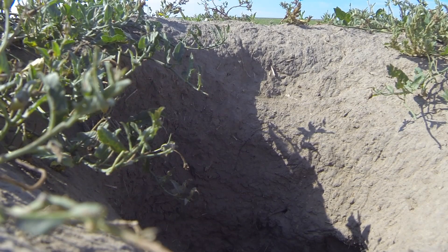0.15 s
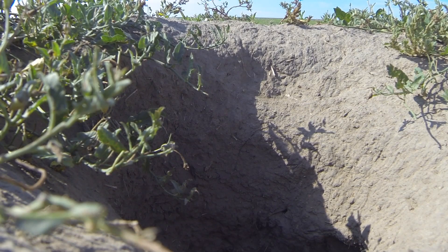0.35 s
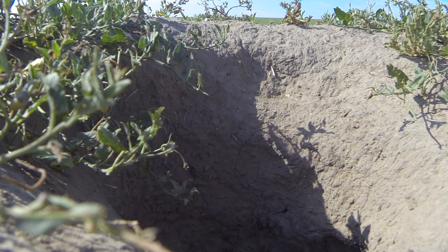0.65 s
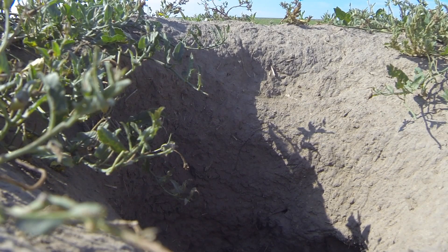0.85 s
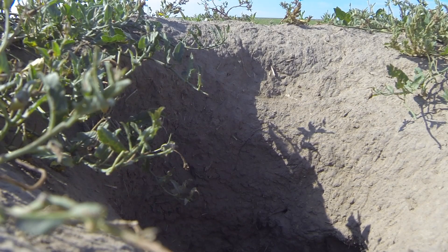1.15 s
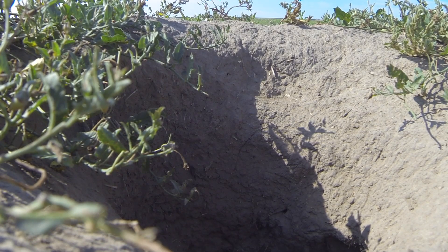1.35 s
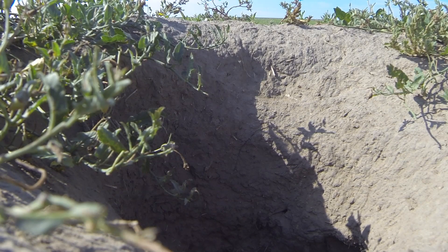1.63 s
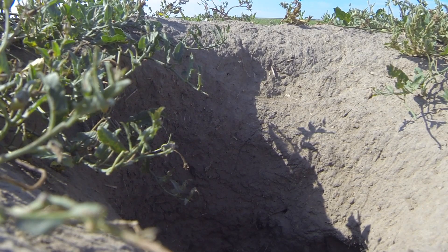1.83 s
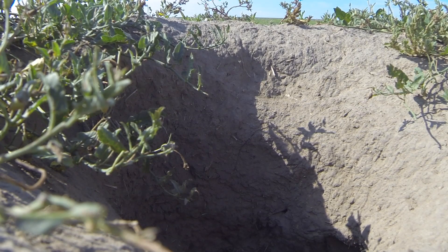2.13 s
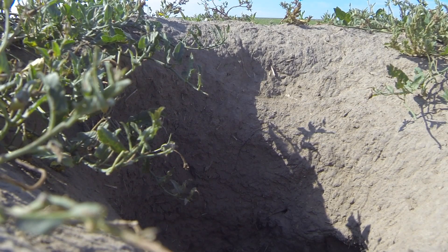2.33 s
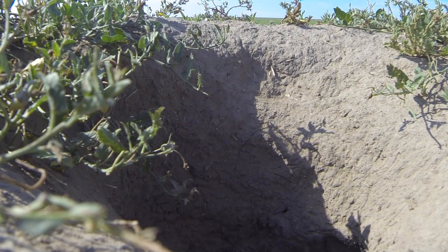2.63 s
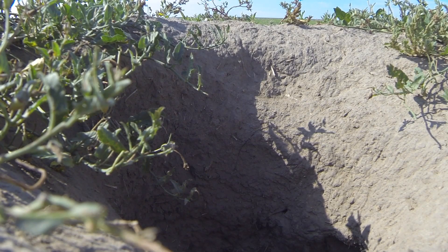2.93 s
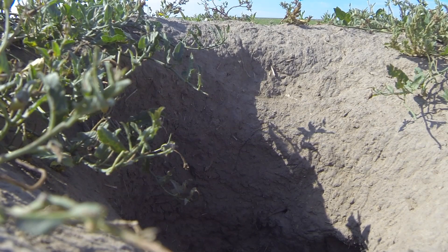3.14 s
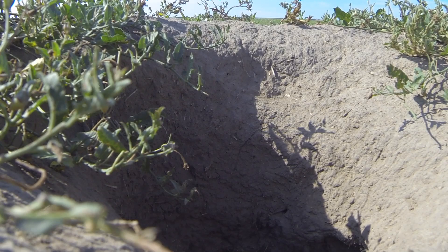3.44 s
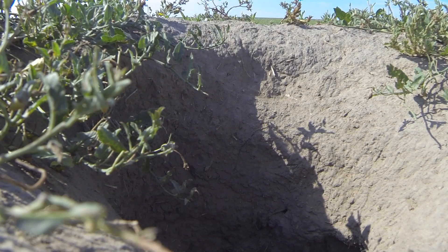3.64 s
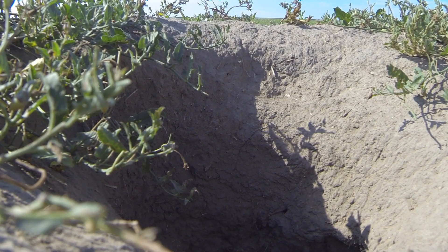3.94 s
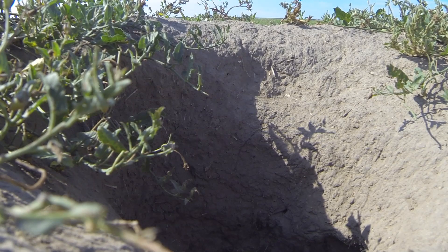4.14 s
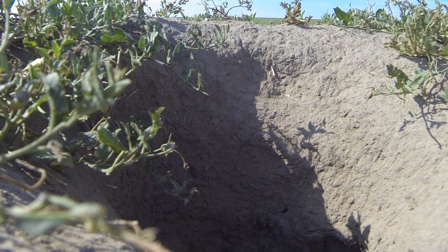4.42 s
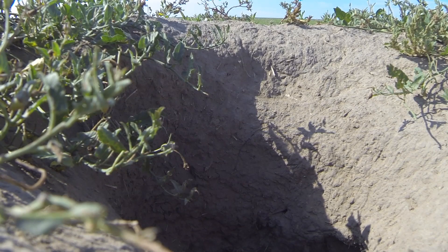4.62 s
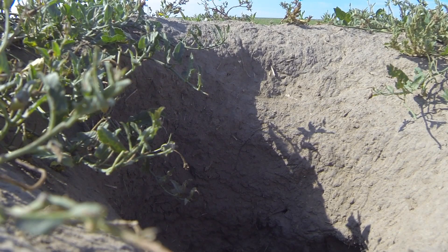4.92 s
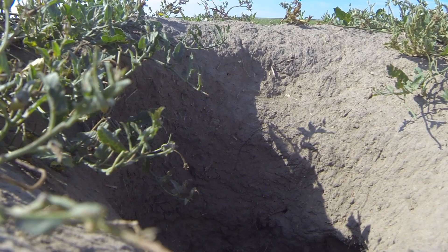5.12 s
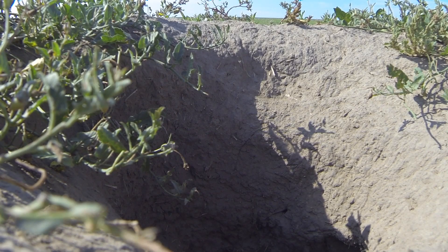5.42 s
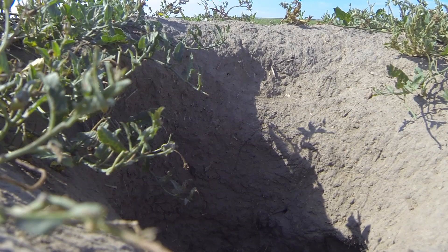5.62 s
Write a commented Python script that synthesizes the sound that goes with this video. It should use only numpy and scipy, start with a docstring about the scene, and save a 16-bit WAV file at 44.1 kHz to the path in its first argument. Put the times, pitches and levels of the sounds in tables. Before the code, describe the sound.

A prairie dog close by gives seven short, sharp, raspy barks, each trailed by a small falling squeak and grunt, over light wind.

```python
"""Open grassland, close to a burrow: a prairie dog barks seven times.
Each bark is a short, rough arch of pitch, built from wavering harmonics and breath through throat resonances.
Small ticks frame it; a raspy, falling squeak and a low grunt follow as the animal recoils.
Behind lie light wind and hiss (coloured noise), a deep drone (noise and a sinking sine) and a thin whine
(narrow-band noise), with soft rustles and clicks before the barking and one faint, distant peep."""
import sys
import numpy as np
from scipy import signal
from scipy.fft import rfft, irfft, next_fast_len
from scipy.io import wavfile
from scipy.ndimage import uniform_filter1d, map_coordinates

SR = 44100
rng = np.random.default_rng(int(sys.argv[2]) if len(sys.argv) > 2 else 0)


def transcribe(signal):
    """Save signal, clipped to [-1, 1], as a 16-bit WAV file at the path in sys.argv[1]."""
    frames = np.atleast_2d(signal).T
    limited = np.clip(frames, -1, 1)
    pcm = np.round(limited * 32767).astype(np.int16)
    wavfile.write(sys.argv[1], SR, pcm)


N = 254456

# Barks: onset t/s, then rise/s, break/s and length/s from the onset,
# crest f/Hz, level/dB (before the throat), roughness offset/dB
BARKS = [ (1.55, 0.013, 0.021, 0.054, 2040, -8, -0.5), (2.091, 0.018, .036, .050, 1988, -11, 0.5),
         (2.9294, 0.01, 0.022, 0.055, 2055, -8.5, 0), (3.518, 0.016, .026, 0.051, 2005, -11, -1.5),
         (4.0968, .015, .025, .052, 1957, -10, 1.5), (4.583, .010, .027, 0.052, 1956, -9.5, 0),
         (5.307, 0.016, .037, 0.053, 1986, -11, 1)]


def amp(db):
    """Decibels to gain."""
    return 10 ** (np.asarray(db) / 20)


def unit(x):
    """Scale to rms 1."""
    return x / np.sqrt(np.mean(x ** 2) + 1e-20)


def curves(rows):
    """One value per sample for each column after the time."""
    s, *cols = np.transpose(rows)
    return [np.interp(np.arange(N) / SR, s, c) for c in cols]


def wobble(rate, size):
    """A smooth random curve with rate knots a second."""
    knots = rng.standard_normal(size // 8)
    return map_coordinates(knots, [np.arange(size) * rate / SR], mode="mirror")


def filtered(x, response):
    """Filter x by a zero-phase response given as a function of f/Hz."""
    m = next_fast_len(len(x) + 8192)
    spectrum = rfft(x, m) * response(np.fft.rfftfreq(m, 1 / SR))
    return irfft(spectrum, m)[:len(x)]


def colour(points):
    """Response through (f/Hz, level/dB) points on a log frequency axis."""
    f, db = np.transpose(points)
    return lambda hz: amp(np.interp(np.log(hz + 1), np.log(f), db))


def resonances(modes):
    """Response summed from steep-sided (f/Hz, width/Hz, level/dB) peaks."""
    return lambda hz: sum(amp(db) / (1 + ((hz - centre) / width) ** 2) ** 2 for centre, width, db in modes)


def noise(response):
    """Coloured noise of rms 1."""
    return unit(filtered(rng.standard_normal(N), response))


def add(track, s, sound):
    """Mix a sound into the track at time s."""
    room = track[round(s * SR):][:len(sound)]
    room += sound[:len(room)]


def gate(start, end, fade):
    """0 outside start..end and 1 inside, with straight fades."""
    t = np.arange(N) / SR
    return np.clip(np.minimum(t - start, end - t) / fade, 0, 1)


def glide(length, pitches_hz, overtone_db, rough):
    """A soft swelling tone through first, middle and last pitch; rough jitters its pitch and level."""
    u = np.clip(np.arange(SR // 10) / SR / length, 0, 1)
    pitch = np.interp(u, [0, .5, 1], pitches_hz) * (1 + rough / 10 * wobble(500, len(u)))
    phase = 2 * np.pi * np.cumsum(pitch) / SR
    tone = np.sin(phase) + amp(overtone_db) * np.sin(2 * phase)
    swell = 4 * u * (1 - u)
    return np.sqrt(2) * tone * swell * (1 + rough * wobble(378, len(u)))


def wind(buffet_gain_db=3, grass_gain_db=2):
    """A light breeze bumps the microphone and brushes the grass: two noises that sway together."""
    # Wind level before the gains: t/s, buffet level/dB, grass level/dB
    breeze = [(0.0, -47, -59), (0.56, -49.5, -58.5), (1.78, -50, -58.5), (2.54, -52.5, -60),
              (2.81, -54.5, -59.5), (3.89, -53, -60.5), (4.5, -55, -60.5), (5.09, -52.5, -60.5),
              (5.37, -56.5, -58.5), (5.77, -52, -61.5)]
    # Low spectrum of the microphone bumps: f/Hz, relative density level/dB
    buffet_colour = [(15, -3.5), (30, -9.5), (50, -1.5), (80, -0.5), (120, -7.5), (200, -13.5),
                     (400, -38.5), (900, -84.5)]
    # Spectrum of the brushed grass: f/Hz, relative density level/dB
    grass_colour = [(60, -31), (150, -21.5), (220, -6.5), (350, -12), (600, -15), (1400, -23.5),
                    (2100, -28.5), (4000, -35), (8000, -42), (9500, -45.5), (11000, -49.5), (13000, -57),
                    (14000, -66)]
    buffet_db, grass_db = curves(breeze)
    sway_db = .5 * wobble(7, N)
    # the bumps sway twice as far in dB as the grass
    buffet = amp(buffet_db + buffet_gain_db + 2 * sway_db) * noise(colour(buffet_colour))
    grass = amp(grass_db + grass_gain_db + sway_db) * noise(colour(grass_colour))
    return buffet + grass


def drone(note_db=-42.5, rumble_db=-50, swell_db=3.0):
    """A deep, swelling rumble of narrow noise; a slowly sinking sine rises out of it past halfway."""
    start_s, fade_s = 3.25, .3
    note_hz, sag_hz_per_s = 44.8, 3.5  # pitch as the note starts, and its fall
    age = np.arange(N) / SR - start_s
    note = np.sqrt(2) * np.sin(2 * np.pi * np.cumsum(note_hz - sag_hz_per_s * age) / SR)
    rumble = amp(swell_db * wobble(6, N)) * noise(resonances([(40.18, 18, 0)]))
    return amp(note_db) * np.clip(age / fade_s, 0, 1) * note + amp(rumble_db) * rumble


def whine(whine_db=-75.0, hop_db=-81, flicker_db=4.5, hiss_db=-81):
    """A thin, insect-like whine of narrow noise flickers and hops upward, over bands of microphone hiss."""
    start_s, end_s, fade_s = 1.93, 5.55, .1
    # Jumps of the whine to its higher band: t/s, length/s
    hops = [(4.17, .15), (4.8, .18)]
    level = gate(start_s, end_s, fade_s) * amp(flicker_db * wobble(14, N))
    hopped = sum(gate(s, s + length, fade=.03) for s, length in hops)
    low = noise(resonances([(14750, 100, 0)]))
    high = noise(resonances([(15190, 50, 0)]))
    insect = level * (amp(whine_db) * (1 - hopped) * low + amp(hop_db) * hopped * high)
    hiss = noise(resonances([(10060, 440, 0), (11900, 1300, -14.5)]))
    return insect + amp(hiss_db) * hiss


def stirrings(click_db=-70, click_t60=0.0062, count=8):
    """Faint stirrings in the grass: soft noise swells, and a patch of tiny, high, decaying noise ticks."""
    clicks_from_s, clicks_to_s = .9, 1.2
    # Rustles: t/s, length/s, peak level/dB
    rustles = [(0.294, 0.032, -53.5), (0.458, 0.03, -54), (0.842, 0.053, -55), (1.18, 0.044, -49.5),
               (1.438, 0.023, -53.5)]
    swells, clicks, t = np.zeros(N), np.zeros(N), np.arange(SR // 10) / SR
    for s, length, db in rustles:
        add(swells, s, amp(db) * np.interp(t, [0, length / 10, length], [0, 1, 0]))
    for s in rng.uniform(clicks_from_s, clicks_to_s, size=count):
        add(clicks, s, amp(click_db + rng.normal(0, 1.8) - 60 * t / click_t60))
    rustling = swells * noise(resonances([(690, 510, 1), (1800, 590, -30)]))
    clicking = clicks * noise(resonances([(11730, 800, 0)]))
    return rustling + clicking


def ticks(lead_db=-41):
    """Tiny dull noise puffs: air leaks just before each bark, and the throat closes after it."""
    close_delay_s, close_db = 0.0082, -28  # from the bark's listed end
    t60, attack, lead = .014, .002, .004  # s
    envelope, t = np.zeros(N), np.arange(SR // 30) / SR
    for s, _, _, length, *_ in BARKS:
        leak = np.interp(t, [0, lead / 2, 2 * lead], [0, 1, 0])
        add(envelope, s - lead, amp(lead_db) * leak)
        closure = amp(close_db - 60 * t / t60) * np.clip(t / attack, 0, 1)
        add(envelope, s + length + close_delay_s, closure)
    dull = colour([(200, -11), (700, 1.0), (1200, -6.5), (1800, -6), (2800, -9), (3700, -11.5),
                   (6000, -31.5), (11000, -70.0)])
    return envelope * noise(dull)


def barks(start_hz=1560, end_hz=1680, jitter=0.016, shimmer=0.15, flutter_hz=540, flutter=0.045,
          buzz_db=-28.0, breath_db=-11, breath_edge_hz=6500, attack=0.0045):
    """Pitch and effort arch up and break to a weaker, hoarser tail; the throat shapes tone and breath alike."""
    # Harmonics at the larynx, from the fundamental up: relative level/dB
    harmonics = [-2, -6, -14.5, -15.5, -20.5, -18.5, -21]
    # Throat and mouth resonances: f/Hz, width/Hz, level/dB
    throat = [(540, 480, -4), (870, 110, -18), (1956, 440, -2.5), (2570, 290, 3.5), (3623, 480, 6),
              (4595, 330, -3), (5200, 460, -17.5), (6110, 400, -10.5), (7160, 870, -7.5),
              (9580, 1100, -18.5), (11650, 1400, -39), (13200, 600, -46)]
    # Roughness at a bark's start, crest, shoulder, break and end: level/dB before each bark's offset
    hoarseness = [-7.5, 4.5, -0.5, 0.5, 5.5]
    crest_sag_hz_per_s = 4000  # the pitch sinks along the crest
    break_s, break_ratio, break_db = 0.009, .868, -6  # time taken, tail pitch over crest pitch, tail level
    overtone_db = -11.5  # the same in every bark: extra force goes into the fundamental
    # pushed above this pitch, the folds flutter ever more strongly
    flutter_pitch_hz, flutter_db_per_hz = 1968, 0.0734
    flutter_bend = .02  # share by which each flutter bends the pitch, before roughness
    sag_hz, release, overhang = 400, .012, .004  # final pitch sag; fade/s, ending overhang/s past the length
    larynx, t = np.zeros(N), np.arange(SR // 10) / SR
    for s, rise, break_at, length, crest_hz, db, rough_db in BARKS:
        stages = [0, rise, break_at, break_at + break_s, length]
        closing = np.clip((length + overhang - t) / release, 0, 1)
        rough = amp(rough_db + np.interp(t, stages, hoarseness))

        shoulder_hz = crest_hz - crest_sag_hz_per_s * (break_at - rise)
        pitch = np.interp(t, stages, [crest_hz, crest_hz, shoulder_hz, break_ratio * crest_hz, end_hz])
        pitch -= (crest_hz - start_hz) * np.clip(1 - t / rise, 0, 1) ** 1.5  # upward scoop eases into the crest
        pitch -= sag_hz * (1 - closing)  # the pitch sags as the air runs out

        # a slower, unsteady fold vibration puts sidebands around each harmonic and buzzes faintly itself
        beat_hz = flutter_hz * (1 + .17 * wobble(300, len(t)))
        beat = rough * np.sin(2 * np.pi * np.cumsum(beat_hz) / SR)
        strain = amp(flutter_db_per_hz * np.maximum(pitch - flutter_pitch_hz, 0))
        bend = 1 + flutter_bend * beat + jitter * rough * wobble(1300, len(t))
        phase = 2 * np.pi * np.cumsum(pitch * bend) / SR
        # cancel the bark's own level on the overtones
        tone = sum(amp(level + (overtone_db - db) * (k > 1)) * np.sin(k * phase)
                   for k, level in enumerate(harmonics, 1))
        tremor = 1 + flutter * strain * beat + shimmer * rough * wobble(900, len(t))
        buzz = amp(buzz_db) * np.sqrt(strain) * beat
        voice = np.sqrt(2) * (tone * tremor + buzz)

        breath = filtered(rng.standard_normal(len(t)), lambda hz: 1 / (1 + (hz / breath_edge_hz) ** 2))
        effort = amp(db + np.interp(t, stages, [-1, 0, -.8, break_db, break_db]))
        opening = np.clip(t / attack, 0, 1) ** 2.3
        add(larynx, s, effort * opening * closing * (voice + amp(breath_db) * rough * breath))
    return filtered(larynx, resonances(throat))


def recoil(rasp_db=-18, catch_rasp_db=-12, rasp_flicker_db=4):
    """The animal draws air: the throat mostly catches, then a raspy squeak slides down into a low grunt."""
    # Catches in the throat: t/s, level/dB
    catch_times = [(1.687, -34), (2.218, -32.5), (3.648, -36), (4.716, -30), (5.437, -33.5)]
    # Recoils: t/s, squeak length/s, squeak middle f/Hz, squeak level/dB, grunt length/s, grunt level/dB
    recoil_times = [ (1.696, .06, 867, -31, 0.064, -35), (2.225, 0.04, 802, -35, .055, -36),
                    (3.083, .031, 775, -35.5, 0.06, -37), (3.653, .038, 862, -37, 0.085, -39),
                    (4.245, .029, 759, -35, 0.0526, -38.5), (4.728, .04, 784, -37.5, .03, -49),
                    (5.446, 0.042, 755, -36.5, 0.036, -36)]
    catch_s, catch_glide_hz = .013, [1204, 811, 614]
    squeak_from_hz, squeak_to_hz = 1140, 566
    grunt_hz, grunt_overlap_s = 237, 0.0142  # the grunt starts just before its squeak ends
    catches, squeaks, grunts = np.zeros((3, N))
    for s, db in catch_times:
        add(catches, s, amp(db) * glide(catch_s, catch_glide_hz, overtone_db=-25, rough=0.28))
    for s, length, middle_hz, squeak_db, grunt_length, grunt_db in recoil_times:
        squeak = glide(length, [squeak_from_hz, middle_hz, squeak_to_hz], overtone_db=-28.5, rough=0.35)
        grunt_glide_hz = [grunt_hz * 1.27, grunt_hz, grunt_hz * 0.96]
        grunt = glide(grunt_length, grunt_glide_hz, overtone_db=-15.5, rough=0.21)
        add(squeaks, s, amp(squeak_db) * squeak)
        add(grunts, s + length - grunt_overlap_s, amp(grunt_db) * grunt)
    # the rasp follows the short-term loudness of catches and squeaks
    driver = amp(catch_rasp_db) * catches + amp(rasp_db) * squeaks
    airflow = np.sqrt(np.abs(uniform_filter1d(driver ** 2, size=200)))
    rasp = noise(resonances([(605, 870, 1.5), (1560, 160, -9.5), (2260, 250, -25.0), (2540, 340, -8.5)]))
    flicker = amp(rasp_flicker_db * wobble(160, N))
    return catches + squeaks + grunts + airflow * flicker * rasp


def burrow(x, wet_db=-27, t60=.05):
    """The earth walls give a very short, weak answer: convolution with decaying noise."""
    t = np.arange(SR // 8) / SR
    tail = rng.standard_normal(len(t)) * amp(-60 * t / t60)
    return x + amp(wet_db) * signal.fftconvolve(x, tail / np.linalg.norm(tail))[:N]


def neighbour(db=-62):
    """One faint, nearly level peep from far across the grass: a short swelling tone."""
    out = np.zeros(N)
    peep = glide(.04, [1535, 1560, 1550], overtone_db=-30, rough=.15)
    add(out, 2.663, amp(db) * peep)
    return out


def scene():
    """The animal in its burrow mouth, and the prairie behind."""
    animal = burrow(barks() + ticks() + recoil())
    prairie = neighbour() + stirrings() + wind() + drone() + whine()
    return (animal + prairie)[None]


def record(dry):
    """The camera's band limit: nothing passes at or above the top frequency."""
    top_hz = 15400
    return np.array([filtered(channel, lambda hz: hz < top_hz) for channel in dry])


dry = scene()
out = record(dry)
transcribe(out)
```